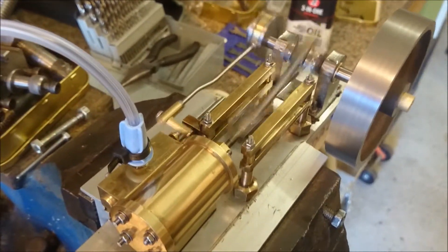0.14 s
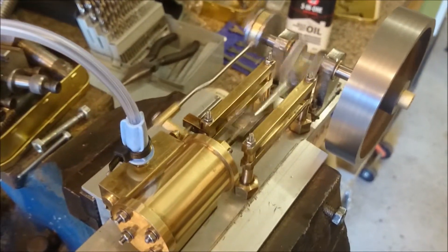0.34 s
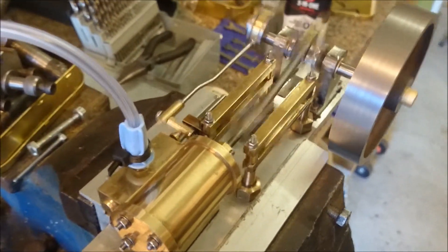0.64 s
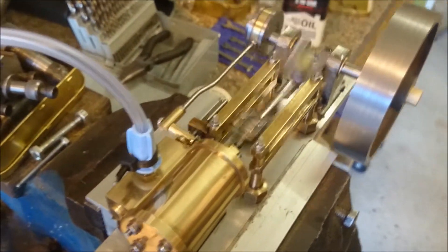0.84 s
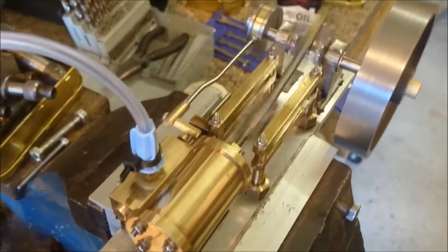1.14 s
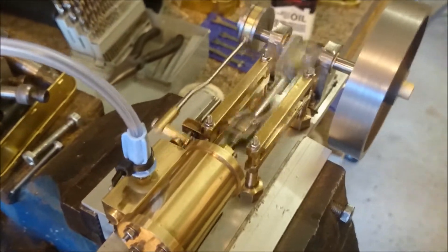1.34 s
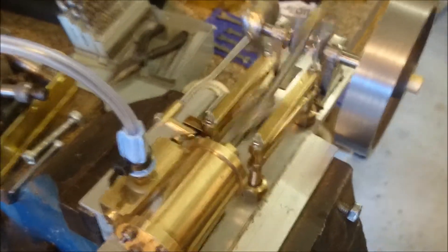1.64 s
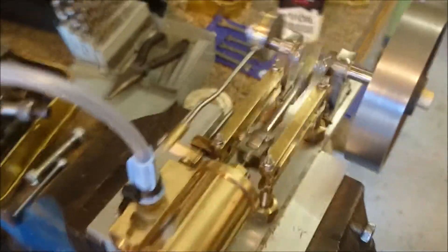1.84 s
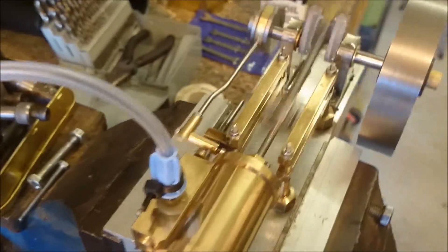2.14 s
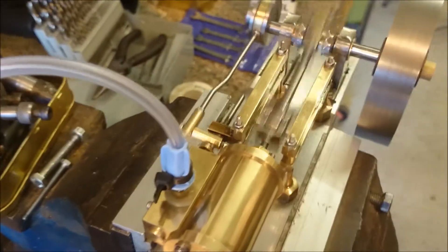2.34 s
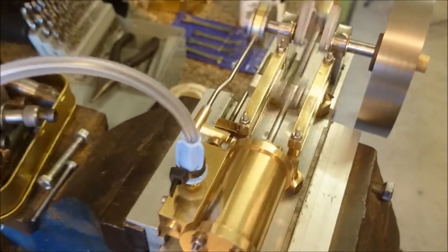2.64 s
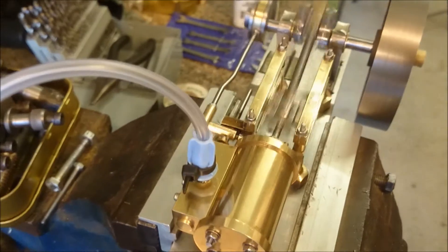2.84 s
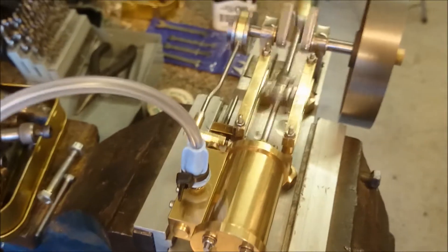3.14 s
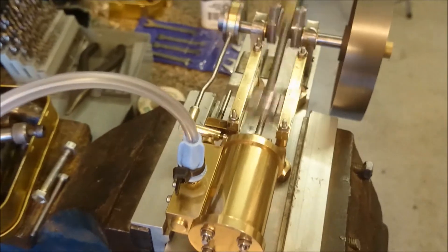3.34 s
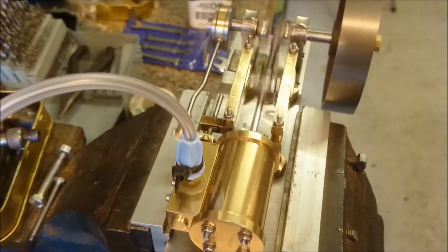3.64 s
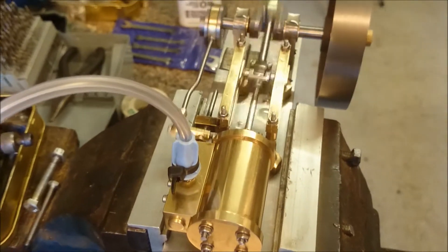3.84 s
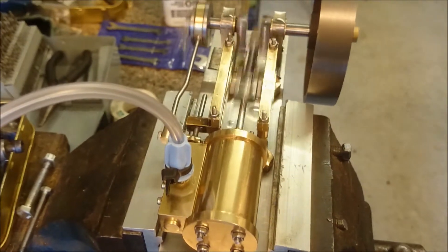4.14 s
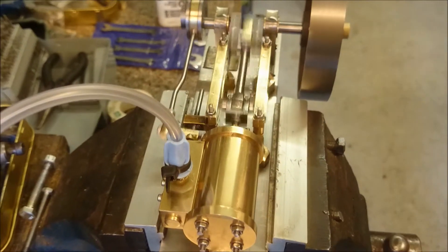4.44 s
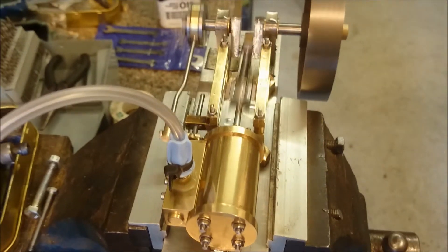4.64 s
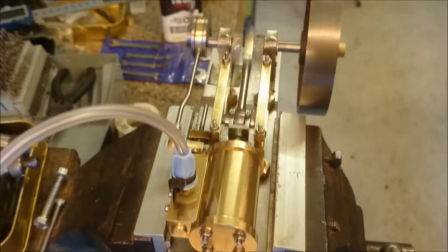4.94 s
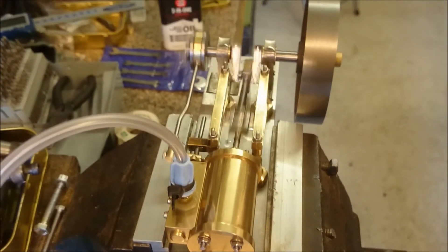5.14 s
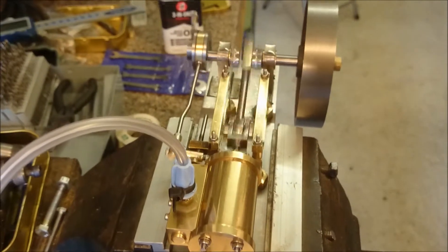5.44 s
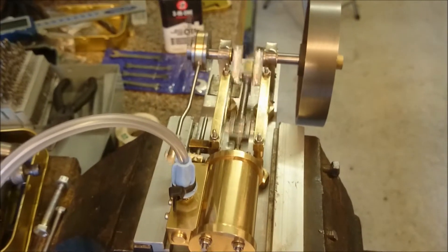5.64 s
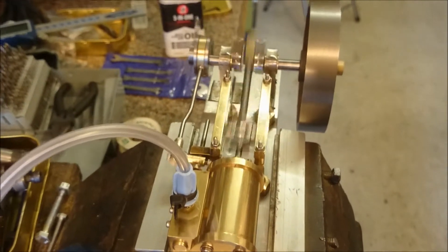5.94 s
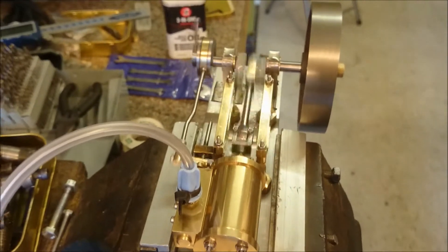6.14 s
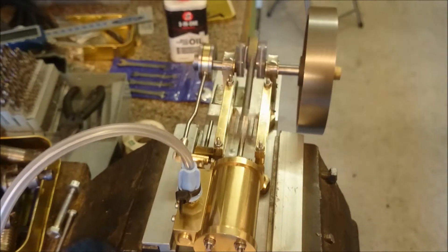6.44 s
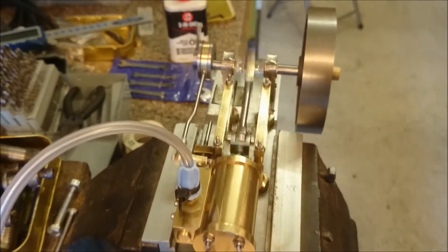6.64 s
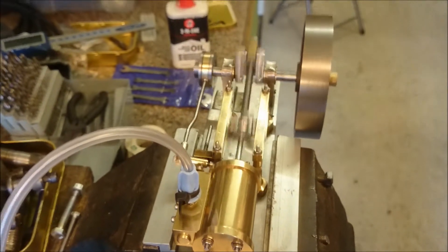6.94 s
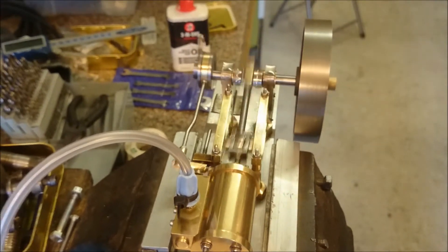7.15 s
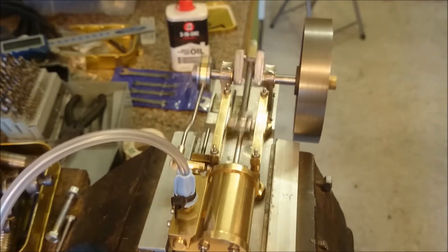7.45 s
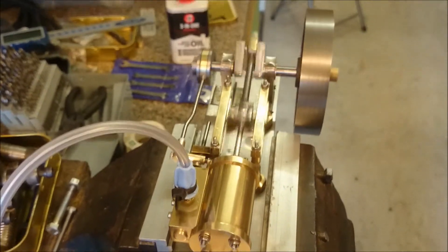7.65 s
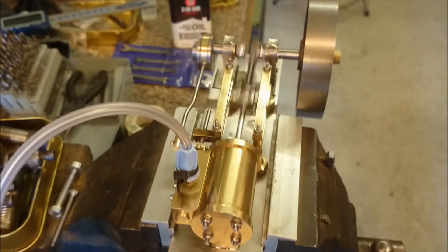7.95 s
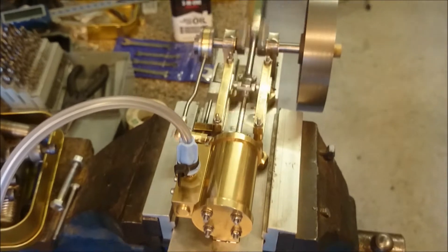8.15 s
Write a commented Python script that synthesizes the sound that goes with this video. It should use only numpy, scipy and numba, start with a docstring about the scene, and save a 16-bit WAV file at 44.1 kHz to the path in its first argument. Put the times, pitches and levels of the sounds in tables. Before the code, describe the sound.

From 0 s the small brass engine is already running, very close to a handheld stereo microphone in a workshop. A dense, bright hiss of compressed air is constant, strongest in the upper mids and treble. Over it the engine chuffs at about six turns a second, slowing very slightly in the first second or two and then holding steady. Every turn has a broad rush of air, a cluster of lower sputtering puffs, a noisy hollow tone sweeping down and back up, and soft, short bearing knocks, slightly uneven from turn to turn. From about 2 to 5 s the microphone swings from beside the engine to behind the cylinder: the hiss lifts slightly in mid swing, its colour slides, and rushes and puffs come forward. From 5 to about 8.4 s the pulsing hiss continues evenly, with short room reflections and faint low rumble, never stopping.

```python
"""Model steam engine on compressed air, hand-held close above

A small brass engine, clamped in a vice in a workshop, settles to nearly six turns a second. Shaped noise
makes the steady hiss of leaking air, a rush once a turn and low exhaust puffs; noise through moving
resonances makes the cavity swept by the piston ring up and down; decaying sines make soft bearing knocks.
The camera, with two microphone ports, swings from beside the engine round to the cylinder end."""
import sys
import numpy as np
from scipy import signal
from scipy.fft import rfft, irfft, next_fast_len
from scipy.io import wavfile
from numba import njit

SR = 44100
rng = np.random.default_rng(int(sys.argv[2]) if len(sys.argv) > 2 else 0)


def master_out(mix):
    """Clip the mix to full scale and print it as 16-bit PCM to the path in sys.argv[1]."""
    frames = np.transpose(np.atleast_2d(mix))
    ceiling = np.clip(frames, -1, 1)
    pcm = np.round(ceiling * 32767).astype(np.int16)
    wavfile.write(sys.argv[1], SR, pcm)


N = 366030
TIME = np.arange(N) / SR
FFT_SIZE = next_fast_len(N, True)
BINS_HZ = np.fft.rfftfreq(FFT_SIZE, 1 / SR)

# Camera position. Each row: time in seconds, swing from 0 beside the engine to 1 behind the cylinder,
# frequency in Hz at which the echo off the vice jaw cancels most.
CAMERA_SWING = [(0, 0, 6350), (2.0, 0.0091, 6340), (2.9, 0.47, 5160), (4.2, 0.66, 4830), (5.0, 1, 4500),
                (8.3, 1, 4700)]
# Spectra of the three air noises before their moving levels. Each row: frequency in Hz, level in dB per Hz.
HISS_SPECTRUM = [(100, -85), (500, -77.5), (1100, -71), (2000, -60.5), (2700, -53.5), (3500, -56.5),
                 (4400, -50.5), (5350, -45), (6000, -48), (6900, -57), (8000, -59.5), (11400, -62.5),
                 (13000, -58.5), (15500, -68.5)]
RUSH_SPECTRUM = [(100, -83), (550, -74.5), (1100, -71), (1600, -65), (2200, -56.5), (2700, -52),
                 (3450, -53), (4000, -46.5), (4700, -50), (5600, -54), (7000, -65.5), (10000, -96)]
PUFF_SPECTRUM = [(100, -78.5), (300, -72.5), (700, -65.2), (1150, -61.5), (1550, -55.5), (2050, -51.3),
                 (2700, -50.2), (3600, -60), (6000, -85)]
# Narrow resonances and dips of valve chest and pipes. Each row: frequency in Hz, width in Hz, lift in dB.
CHEST_RESONANCES = [(960, 63, -2), (1262, 86, -11.5), (1330, 200, 1.5), (1995, 53, 2.5), (2297, 105, 6),
                    (2307, 100, -8), (2500, 62, 2), (2816, 160, 3), (3000, 150, -1), (3260, 220, 3),
                    (3830, 360, -1.5), (3924, 130, 4), (5130, 260, 0.6), (8940, 420, 3.5)]
# Exhaust puffs of one turn. Each row: crank angle in turns, half width in turns, relative level in dB.
EXHAUST_PUFFS = [(.21, .019, -5.5), (.33, .037, -1.2), (.565, .028, .2), (.626, .04, -1.3)]
# Modes of the cavity swept by the piston. Each row: Hz when shortest, Hz when longest, width in Hz,
# dB per Hz when shortest, dB per Hz when longest, both before the hiss level.
CAVITY_MODES = [(7200, 2100, 450, -54, -55.5), (15700, 11000, 1700, -58.3, -60.5),
                (13000, 8800, 800, -66, -62)]
# Play in the bearings is taken up. Each row: crank angle in turns, blow in dB before the frame rings.
BEARING_KNOCKS = [(.195, -40.5), (0.302, -41), (.57, -40.5), (.81, -43.5)]
# Modes of the frame in the vice. Each row: frequency in Hz, 60 dB decay time in seconds, relative level in dB.
FRAME_MODES = [(167, 0.015, -8), (389, 0.013, -20), (487, 0.022, 3.5), (690, 0.021, 6), (1360, .015, -11)]
# Reflections off vice and bench. Each row: delay in ms from beside, delay in ms from behind, gain.
BENCH_ECHOES = [(1.45, 1.67, 0.023), (3.1, 3.6, 0.074), (6.3, 5.7, 0.11), (9.4, 11, 0.16)]
# The two microphone ports. Each row: frequency in Hz, left over right in dB from beside, the same from behind,
# coherence 0-1 (limited to 0.98 in use), phase lead of the left in radians.
MIC_PORTS = [(100, 6, 1, .05, .5), (400, 12, 0, .1, .6), (1200, 3.8, .8, .58, 1.1),
             (2200, 1.9, 3.2, .7, 2.3), (2800, 5.6, 5.5, .68, 3.1), (3350, -.8, 7, .45, 3.4),
             (4100, 6, 10.8, .15, 2.4), (4700, 1.7, 1.2, .78, 0), (5250, 1.1, -.8, .88, 0),
             (5700, 1, -5.5, .5, 0), (6050, .8, -10, .6, -1), (7000, .9, -1.3, .9, 0),
             (10000, .4, 0, .96, 0), (11600, 1.3, 2.8, .75, 0), (13000, .6, -.2, .9, 0)]
# Change of colour from beside the engine to behind it. Each row: frequency in Hz, change in dB.
POSITION_TINT = [(100, -4.5), (1200, -2.5), (2200, -0.5), (2800, -2.5), (4050, -2), (4700, -2.5),
                 (5300, -0.7), (6000, 0.5), (7300, -4), (9000, 0.5), (12800, -0.5), (14200, -3.5),
                 (15500, 3)]
# Workshop rumble before its slow wander. Each row: frequency in Hz, level in dB per Hz.
RUMBLE_SPECTRUM = [(10, -85), (25, -81), (42, -76.5), (70, -83.5), (150, -89), (500, -98), (4000, -110)]

# crank: start (turns), steady speed and initial excess (turns per s), settling time (s)
START_TURN = .330
TURNS_PER_S, EXCESS_TURNS_PER_S, SETTLE_S = 5.809, .29, .7
DEAD_CENTRE = 0.96  # crank angle (turns) at which the cavity is shortest
# the port is open for one stretch of every turn: crank angles (turns)
PORT_OPENS, PORT_CLOSES = 0.13, 0.815
# the rush swells before that stretch and dies away after it (turns), down to a trickle (relative dB)
RUSH_ATTACK_TURNS, RUSH_RELEASE_TURNS, SHUT_DB = 0.082, 0.11, -18
# it slackens while the piston turns round: crank angle (turns), half width (turns), depth (dB)
SLACK_ANGLE, SLACK_TURNS, SLACK_DB = .48, 0.1, -1.5
# the leak: level with the port shut, its sag with the port open, its spit at the first puff (dB)
LEAK_DB, LEAK_SAG_DB, SPIT_DB = -.5, -0.37, 1.6
PUFF_SPUTTER_DB = 1.1
# the strokes are louder from behind the cylinder (dB)
RUSH_BESIDE_DB, RUSH_BEHIND_DB = -1, 1
PUFF_BESIDE_DB, PUFF_BEHIND_DB = -3.4, -0.16
# the hiss is loudest as the camera crosses its jet in mid swing: level off the jet, lift on it (dB)
HISS_DB, JET_DB = -0.72, .7
# the two bands that the echo off the vice jaw thins; the top depth is the one heard from behind
NOTCH_WIDTH_HZ, NOTCH_DEPTH = 450., .35
TOP_NOTCH_HZ, TOP_NOTCH_WIDTH_HZ, TOP_NOTCH_DEPTH = 14600, 550, .65
ROOM_T60_S, ROOM_DB = 0.35, -10.5
TOP_HZ = 15750  # upper limit of the microphone chain


def undb(db):
    """Decibels to gain."""
    return 10 ** (np.asarray(db) / 20)


def curves(table):
    """Each column of a time table at every sample."""
    seconds, *columns = np.transpose(table)
    return [np.interp(TIME, seconds, column) for column in columns]


def spectra(table):
    """Each column of a frequency table at every bin, on a log frequency scale."""
    hz, *columns = np.transpose(table)
    return [np.interp(np.log(BINS_HZ + 1), np.log(hz), column) for column in columns]


def blend(beside, behind, swing):
    """A value that follows the camera from beside the engine to behind it."""
    return beside + (behind - beside) * swing


def colour(x, response):
    """Filter by a frequency response."""
    return irfft(rfft(x, FFT_SIZE) * response, FFT_SIZE)[..., :N]


def turbulence():
    """Two unrelated white noises at 0 dB per Hz."""
    return rng.standard_normal((2, N)) * np.sqrt(SR / 2)


def walk(rate):
    """Smooth chance of unit spread, with `rate` new values a second."""
    steps = np.interp(TIME * rate, np.arange(4096), rng.standard_normal(4096))
    return steps / steps.std()


@njit
def resonate(x, hz, width):
    """State-variable band-pass with a moving centre, gain 1 at the peak."""
    y, band, low = np.empty(len(x)), 0., 0.
    for i in range(len(x)):
        g = np.tan(np.pi * hz[i] / SR)
        damping = np.pi * width / SR * (1 + g * g) / g
        v = (band + g * (x[i] - low)) / (1 + g * (g + damping))
        band = 2 * v - band
        low = low + 2 * g * v
        y[i] = damping * v
    return y


def resonate_pair(x, hz, width):
    """The same moving band-pass on both channels."""
    return np.array([resonate(channel, hz, float(width)) for channel in x])


def crank_angle():
    """Turns made so far by a flywheel that starts a little fast and settles to a steady speed."""
    speed = TURNS_PER_S + EXCESS_TURNS_PER_S * np.exp(-TIME / SETTLE_S)
    return START_TURN + np.cumsum(speed) / SR


def bump(crank, angle, width):
    """A smooth swell once a turn around a crank angle."""
    offset = (crank - angle + .5) % 1 - .5
    return np.exp(-.5 * (offset / width) ** 2)


def per_turn(crank, spread_db):
    """No two turns blow quite alike: one random gain a turn."""
    return undb(spread_db * rng.standard_normal(64)[crank.astype(int)])


def port_opening(crank):
    """The port swells open, holds and shuts once a turn, from 0 to 1."""
    corners = [PORT_OPENS - RUSH_ATTACK_TURNS, PORT_OPENS, PORT_CLOSES, PORT_CLOSES + RUSH_RELEASE_TURNS]
    return np.interp(crank, corners, [0, 1, 1, 0], period=1)


def chest_db():
    """Valve chest and pipes lift or dip narrow bands of the air passing through."""
    return sum(db / (1 + (2 * (BINS_HZ - hz) / width) ** 2) for hz, width, db in CHEST_RESONANCES)


def leak(crank, hiss_db):
    """Air hisses past the valve all the time, sagging as the port opens and spitting at the first puff."""
    puff_angle, puff_width, _ = EXHAUST_PUFFS[0]
    leak_db = LEAK_DB + LEAK_SAG_DB * port_opening(crank) + SPIT_DB * bump(crank, puff_angle, puff_width)
    flutter_db = 0.28 * walk(rate=130)  # oil in the gaps
    air = colour(turbulence(), undb(spectra(HISS_SPECTRUM)[0] + chest_db()))
    return air * undb(hiss_db + leak_db + flutter_db)


def rush(crank, stroke_db):
    """Air rushes while the port is open and slackens while the piston turns round."""
    rush_db = SHUT_DB * (1 - port_opening(crank)) + SLACK_DB * bump(crank, SLACK_ANGLE, SLACK_TURNS)
    flutter_db = 0.8 * walk(rate=140)  # oil in the gaps
    air = colour(turbulence(), undb(spectra(RUSH_SPECTRUM)[0] + chest_db()))
    return air * undb(stroke_db + rush_db + flutter_db) * per_turn(crank, spread_db=1.0)


def exhaust(crank):
    """Spent air leaves in low, sputtering puffs at fixed crank angles."""
    flow = 0
    for angle, width, db in EXHAUST_PUFFS:
        flow = flow + undb(db) * per_turn(crank, spread_db=.3) * bump(crank, angle, width)
    sputter = undb(PUFF_SPUTTER_DB * walk(rate=210))
    return colour(turbulence(), undb(spectra(PUFF_SPECTRUM)[0])) * flow * sputter


def cavity(crank):
    """The piston lengthens and shortens an air column, so its modes dive and rise once a turn."""
    travel = (1 - np.cos(2 * np.pi * (crank - DEAD_CENTRE))) / 2
    out = 0
    for short_hz, long_hz, width, short_db, long_db in CAVITY_MODES:
        hz = 1 / ((1 - travel) / short_hz + travel / long_hz)  # the period grows with length
        gain = undb(short_db + (long_db - short_db) * np.sqrt(travel))
        out = out + gain * resonate_pair(turbulence(), hz, width)
    return out


def shop_rumble():
    """The workshop's low background noise wanders slowly in level."""
    return colour(turbulence(), undb(spectra(RUMBLE_SPECTRUM)[0])) * undb(1.3 * walk(rate=6))


def bearings(crank):
    """Each reversal of load takes up play in the bearings and knocks the frame into a short ring."""
    blows, turns = np.zeros((2, N)), np.arange(1, int(crank[-1]))
    for angle, db in BEARING_KNOCKS:
        timing, strength, side = rng.standard_normal((len(turns), 3)).T
        at = np.searchsorted(crank, turns + angle + 0.004 * timing).clip(0, N - 1)
        # as in the air noises, the first channel becomes common to both ports, the second opposed
        blows[0, at] += undb(db + 1.9 * strength)
        blows[1, at] += undb(db) * .5 * side
    t = TIME[:SR // 8]
    ring = sum(undb(db - 60 * t / t60) * np.sin(2 * np.pi * hz * t) for hz, t60, db in FRAME_MODES)
    return signal.oaconvolve(blows, ring[None], axes=1)[:, :N]


def vice_echo(x, notch_hz, swing):
    """The nearest reflection thins a band that slides with the camera and a top one that deepens."""
    top_depth = np.clip(TOP_NOTCH_DEPTH * (1 + swing) / 2, 0, 1)
    sliding_band = resonate_pair(x, notch_hz, NOTCH_WIDTH_HZ)
    top_band = resonate_pair(x, np.full(N, float(TOP_NOTCH_HZ)), TOP_NOTCH_WIDTH_HZ)
    return x - NOTCH_DEPTH * sliding_band - top_depth * top_band


def workshop(x, swing):
    """Near reflections comb the sound and slide as the camera moves; a short tail follows."""
    out = x.copy()
    for beside_ms, behind_ms, gain in BENCH_ECHOES:
        delay = blend(beside_ms, behind_ms, swing) / 1000
        out += gain * np.array([np.interp(TIME - delay, TIME, channel, left=0) for channel in x])
    t = TIME[:SR // 2]
    tail = rng.standard_normal((2, len(t))) * undb(-60 * t / ROOM_T60_S)
    tail /= np.sqrt(np.sum(tail ** 2, axis=1, keepdims=True))
    return out + undb(ROOM_DB) * signal.oaconvolve(x, tail, axes=1)[:, :N]


def ports(x, swing):
    """One noise reaches both ports alike, the other opposed; shading changes with the camera position."""
    beside_db, behind_db, coherence, lead = spectra(MIC_PORTS)
    half_tint_db = spectra(POSITION_TINT)[0] / 2
    sides = np.array([[1], [-1]])  # left, right
    coherence = np.clip(coherence, 0, .98)
    common = colour(x[0], np.sqrt((1 + coherence) / 2))
    opposed = colour(x[1], np.sqrt((1 - coherence) / 2))
    pair = common + sides * opposed
    out = 0
    for share, pan_db, tint_db in ((1 - swing, beside_db, -half_tint_db), (swing, behind_db, half_tint_db)):
        shade = np.sqrt(2 / (1 + undb(-2 * sides * pan_db))) * undb(tint_db)
        out = out + share * colour(pair, shade * np.exp(.5j * sides * lead))
    return out


def scene():
    """The crank angle drives every engine sound; the camera's swing sets their balance."""
    crank = crank_angle()
    swing, notch_hz = curves(CAMERA_SWING)
    swing = np.clip(swing, 0, 1)
    hiss_db = HISS_DB + JET_DB * np.sin(np.pi * swing)
    stroke_db = blend(RUSH_BESIDE_DB, RUSH_BEHIND_DB, swing)
    puff_db = blend(PUFF_BESIDE_DB, PUFF_BEHIND_DB, swing)
    air = leak(crank, hiss_db) + rush(crank, stroke_db)
    air = air + exhaust(crank) * undb(puff_db) + cavity(crank) * undb(hiss_db)
    rumble = shop_rumble()
    engine = vice_echo(air + bearings(crank), notch_hz, swing)
    return ports(workshop(engine, swing), swing) + rumble


def record(dry):
    """Peaks beyond full scale clip, then a steep low-pass cuts the highest treble."""
    low_pass = signal.ellip(10, .1, 70, TOP_HZ, fs=SR, output="sos")
    return signal.sosfilt(low_pass, np.clip(dry, -1, 1))


dry = scene()
out = record(dry)
master_out(out)
```